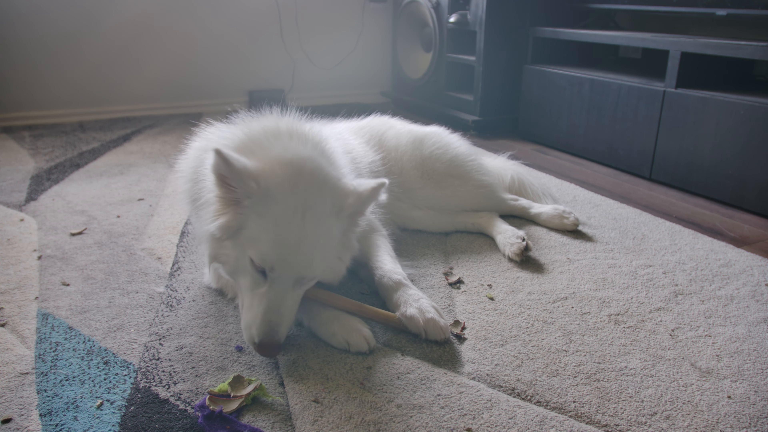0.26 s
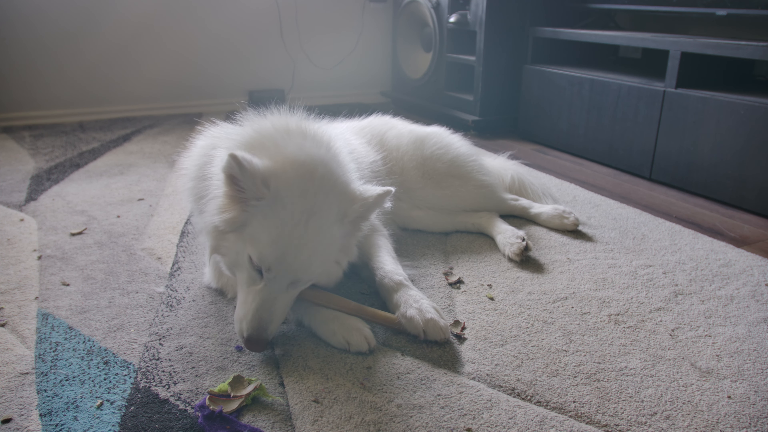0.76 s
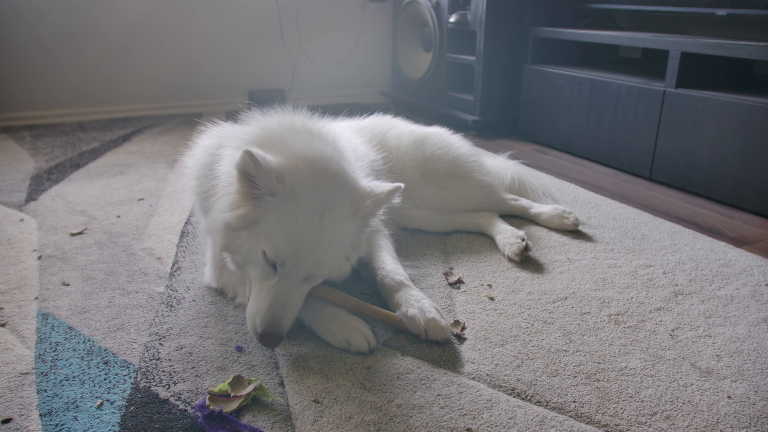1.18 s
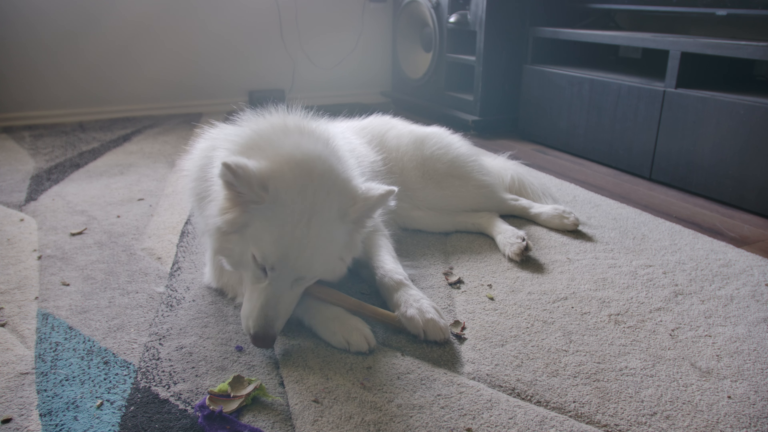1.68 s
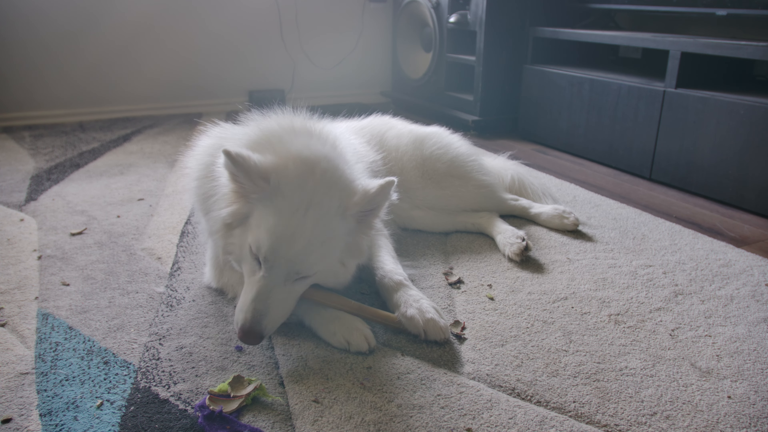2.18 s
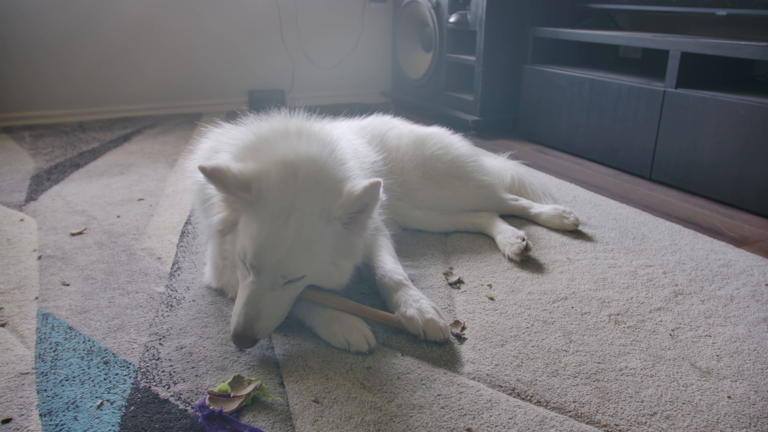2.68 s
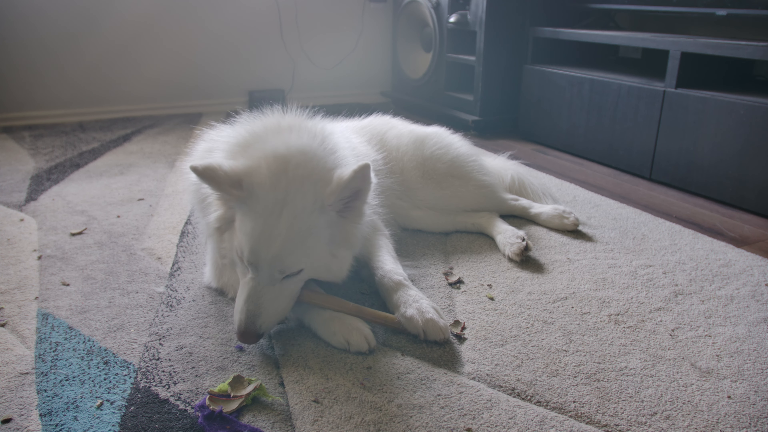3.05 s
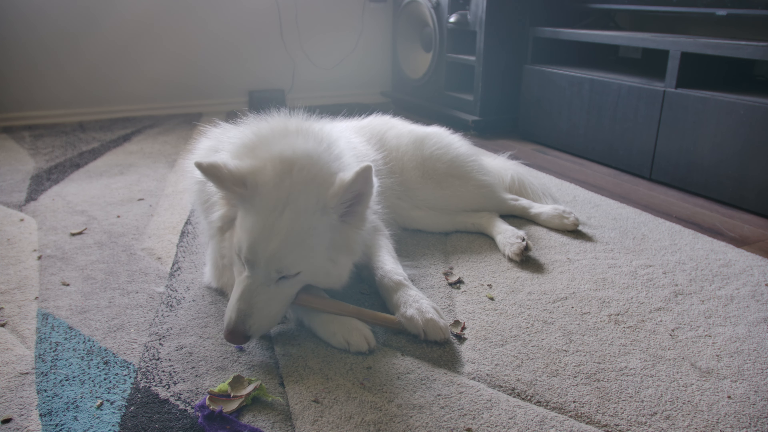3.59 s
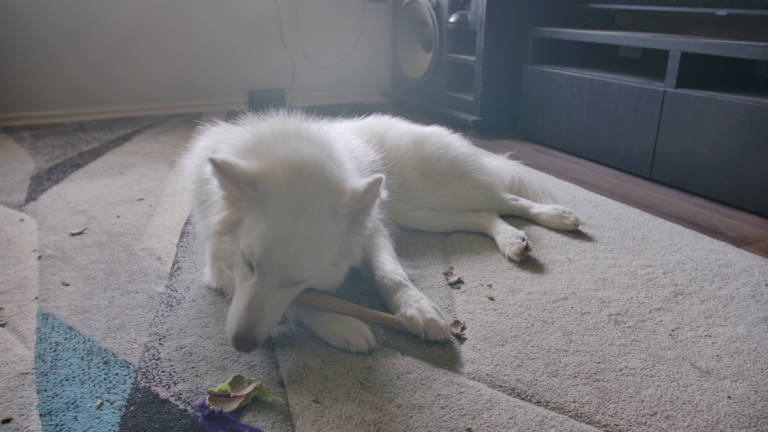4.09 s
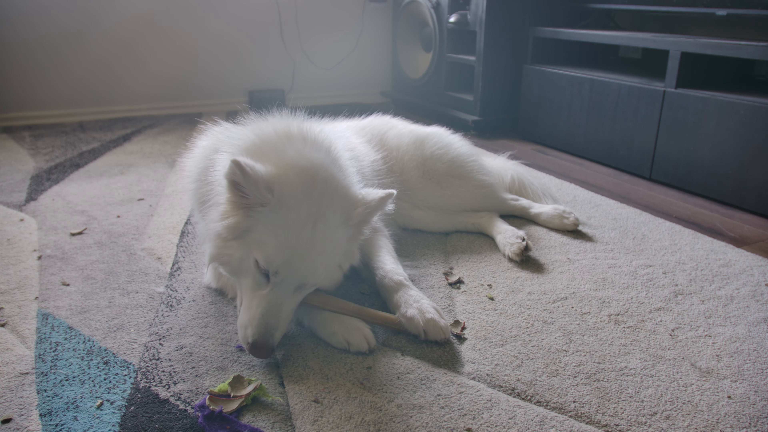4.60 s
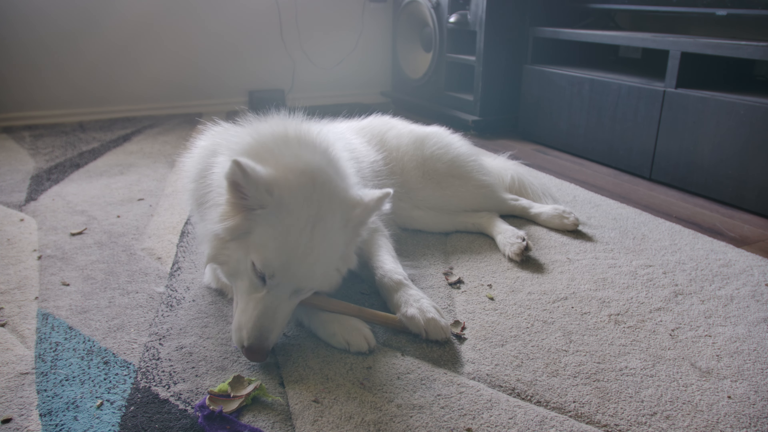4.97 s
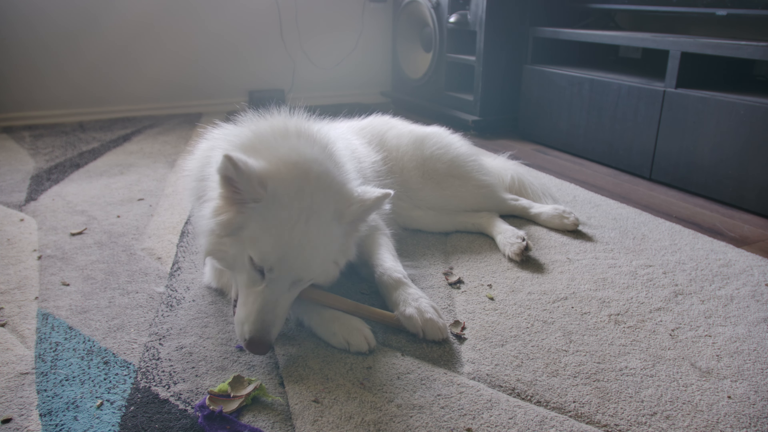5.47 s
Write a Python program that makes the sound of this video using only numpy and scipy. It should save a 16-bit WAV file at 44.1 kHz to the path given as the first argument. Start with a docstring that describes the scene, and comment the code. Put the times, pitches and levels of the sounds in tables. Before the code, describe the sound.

Close in a quiet carpeted living room, a dog chews a bone. Dull woody tooth knocks come irregularly, with soft rubbing and tiny wet mouth ticks between. Sharper splitting cracks fall near two, three and four seconds, and the heaviest crunch comes at about five. A faint room noise and thin electronic whine are held low and swell briefly around the bites.

```python
"""A quiet living room: a dog lying on the carpet gnaws a chew bone.
Teeth knock dully as damped bone modes; splits add a ringing splinter and crumbs.
Filtered noise makes the friction of the bone, and short filtered bursts the wet ticks of the mouth.
The camera's noise suppressor holds down steady room noise and a faint electronic whine made of sines;
each band opens when the sound rises well over its usual level."""
import sys
import numpy as np
from scipy import signal
from scipy.fft import rfft, irfft
from scipy.io import wavfile
from scipy.ndimage import uniform_filter1d, minimum_filter1d

SR = 44100
rng = np.random.default_rng(int(sys.argv[2]) if len(sys.argv) > 2 else 0)


def inscribe(sig):
    """Save sig as 16-bit PCM at rate SR to the path in sys.argv[1].

    A 1-D sig is mono; a 2-D sig holds one channel per row.
    Samples are clipped to [-1, 1] before scaling.
    """
    pcm = np.round(np.clip(np.atleast_2d(sig).T, -1, 1) * 32767)
    wavfile.write(sys.argv[1], SR, pcm.astype(np.int16))


N = 253116  # length of the scene in samples


def gain_of(db):
    """Decibels to amplitude."""
    return 10 ** (np.asarray(db) / 20)


def evened(x):
    """Scales to rms 1."""
    return x / np.sqrt(np.mean(x ** 2) + 1e-20)


def read(points, hz):
    """Reads a table on a log-frequency axis."""
    f, value = np.transpose(points)
    return np.interp(np.log(hz + 1), np.log(f + 1), value)


def band(x, low_hz, high_hz, low_order, high_order):
    """Causal high-pass at low_hz, then low-pass at high_hz."""
    high_pass = signal.butter(low_order, low_hz, "high", fs=SR, output="sos")
    low_pass = signal.butter(high_order, min(high_hz, SR / 2 - 1), fs=SR, output="sos")
    return signal.sosfilt(low_pass, signal.sosfilt(high_pass, x))


def add(mix, s, peak_db, sound):
    """Adds a short sound with its centre of energy at time s and its envelope peak at peak_db."""
    centre = np.average(np.arange(len(sound)), weights=sound ** 2)
    start = max(round(s * SR - centre), 0)
    part = mix[start:][:len(sound)]
    scaled = gain_of(peak_db) * sound / abs(signal.hilbert(sound)).max()
    part += scaled[:len(part)]


# colour of the room noise: (f/Hz, relative level per Hz/dB)
AIR_COLOUR = [(20, -1.5), (32, -9.5), (48, 3), (68, -1), (105, 0), (190, -3.5), (240, 0), (340, -9.5),
              (600, -10.5), (1000, -13.5), (1700, -20.5), (3200, -25.5), (5000, -26), (8000, -28),
              (15500, -31)]
# how alike the noise is left and right: (f/Hz, correlation/0-1)
AIR_LIKENESS = [(30, 0.15), (120, 0.99), (1000, 0.9), (2500, 0.79), (5000, 0.67), (12000, 0.68)]
AIR_DB = -53.5  # rms ahead of the noise suppressor


def air():
    """Steady room noise: a shared part plus an opposed part make two partly alike channels."""
    hz = np.fft.rfftfreq(N, 1 / SR)
    common, apart = rfft(rng.standard_normal((2, N)))
    same = np.clip(read(AIR_LIKENESS, hz), 0, 1)
    mid = np.sqrt(1 + same) * common
    side = np.sqrt(1 - same) * apart
    left_right = np.array([mid + side, mid - side])
    coloured = irfft(left_right * gain_of(read(AIR_COLOUR, hz)), N)
    return gain_of(AIR_DB) * evened(coloured)


EDGE_HZ = 15720  # upper limit of the sound, and of the whine's harmonics
WHINE_HZ, STRAY_HZ = 1000, 5146  # fundamental, and a tone outside its series
# rms ahead of the noise suppressor; every third harmonic is changed by THIRDS_DB
WHINE_DB, WHINE_DB_PER_OCTAVE, THIRDS_DB, STRAY_DB = -56, -7.5, -8, -75


def whine():
    """Thin steady tones from the camera's electronics: one harmonic series and a stray tone."""
    t = np.arange(N) / SR
    k = np.arange(1, EDGE_HZ // WHINE_HZ + 1)
    levels = WHINE_DB + WHINE_DB_PER_OCTAVE * np.log2(k) + THIRDS_DB * (np.gcd(k, 3) > 1)
    tones = [*zip(k * WHINE_HZ, levels), (STRAY_HZ, STRAY_DB)]
    return sum(np.sqrt(2) * gain_of(db) * np.sin(2 * np.pi * (hz * t + rng.random())) for hz, db in tones)


# how fast the room dies away: (f/Hz, time to fall 60 dB t60/s)
ROOM_DECAY = [(150, 0.222), (500, 0.21), (1500, 0.328), (8000, 0.7)]


def room(x, wet_db=-21):
    """A carpeted room: sparse weak reflections, each band dying at its own speed."""
    length = SR // 2
    reflections = rng.standard_normal(length) * (rng.random(length) < 3000 / SR)  # about 3000 a second
    hz, t, z = signal.stft(reflections, SR, nperseg=256)
    decay = gain_of(-60 * t / read(ROOM_DECAY, hz)[:, None])
    tail = signal.istft(z * decay, SR, nperseg=256)[1]
    return x + gain_of(wet_db) * signal.fftconvolve(x, tail / np.linalg.norm(tail))[:N]


# strokes of the bone on paw and carpet: (middle t/s, rms level/dB, centre f/Hz)
RUB_STROKES = [(.01, -56, 276), (.2, -55.5, 252), (.73, -60.5, 259), (.94, -59.5, 430), (1.2, -61.5, 234),
               (1.902, -59, 168), (3.04, -57, 100.7), (3.42, -66, 310), (4.069, -59.5, 239),
               (4.37, -64.5, 722), (5.119, -56.5, 680), (5.3, -56, 319)]
RUB_S, RUB_OCTAVES = 0.13, 1  # length and bandwidth of every stroke


def rubs():
    """Soft dull friction as the bone shifts on paw and carpet: noise in one band, faded in and out."""
    out = np.zeros(N)
    spread = 2 ** (RUB_OCTAVES / 2)
    for s, db, hz in RUB_STROKES:
        start, end = max(round((s - RUB_S / 2) * SR), 0), round((s + RUB_S / 2) * SR)
        part = out[start:end]
        noise = rng.standard_normal(SR // 2)
        friction = band(noise, hz / spread, hz * spread, low_order=3, high_order=5)[:len(part)]
        part += gain_of(db) * evened(friction * signal.windows.tukey(len(friction), .5))
    return out


# the mouth is wettest while the dog takes a new hold on the bone: (t/s, lift of the faint ticks' level/dB)
MOUTH_WETNESS = [(0, 4), (.1, 8), (.6, 3.5), (1.4, 5), (2.2, 0.5), (5.7, 5)]


def saliva(per_s=55, crackle_s=.0008, db=-57):
    """Faint ticks of lips and tongue: one tiny noise burst repeated at random times and sizes."""
    t = np.arange(SR // 50) / SR
    burst = rng.standard_normal(len(t)) * np.exp(-t / crackle_s)
    tick = band(burst, 1200, 5400, low_order=2, high_order=2)
    sizes = (rng.random(N) < per_s / SR) * gain_of(rng.uniform(-6, 6, N))
    wetness_db = np.interp(np.arange(N) / SR, *np.transpose(MOUTH_WETNESS))
    return gain_of(db + wetness_db) * signal.oaconvolve(sizes, tick / abs(tick).max())[:N]


def snap(hz, octaves, order, crackle_s=0.00107, crackle_db=-20):
    """One sharp snap and a millisecond of finer crackle ring a splinter or a small cavity."""
    t = np.arange(SR // 50) / SR
    crackle = rng.standard_normal(len(t)) * np.exp(-t / crackle_s)
    burst = (t == 0) + gain_of(crackle_db) * crackle
    edges = np.minimum(hz * 2 ** (octaves * np.array([-.5, .5])), SR / 2 - 1)
    return signal.sosfilt(signal.butter(order, edges, "bandpass", fs=SR, output="sos"), burst)


# sharper wet ticks of the mouth: (t/s, peak level/dB, centre f/Hz, width/octaves)
MOUTH_TICKS = [(.051, -36.5, 4130, 1.7), (.139, -44, 4500, 2.2), (.185, -37.5, 3360, 2),
               (.363, -53.5, 2020, 1.1), (.463, -44.5, 1770, .8), (.93, -45, 4100, 0.21),
               (1.027, -40, 4340, 0.088), (1.3333, -34, 5000, 0.78), (1.408, -39.5, 6500, 0.42),
               (1.424, -42, 7300, 0.55), (2.025, -40, 7100, 0.18), (3.104, -64.5, 7600, 0.7),
               (4.985, -33, 4770, 1.2), (5.122, -40.5, 6640, 0.45), (5.140, -38.5, 6760, .9)]


def ticks():
    """The sharper wet ticks of the mouth: snaps, each ringing in its own band."""
    out = np.zeros(N)
    for s, db, hz, octaves in MOUTH_TICKS:
        add(out, s, db, snap(hz, octaves, order=1))
    return out


# modes of bone and jaw, before the grip scales f and width:
# (f/Hz, width/Hz, level clamped between the teeth/dB, level ringing freely/dB)
BONE_MODES = [(141, 120, -5.5, -37.5), (283, 65.8, 2, -34.5), (490, 141, -2, 6.5), (647, 70, -18.5, -24),
              (893, 410, 1, -17), (1103, 94.4, 0.5, -3), (1605, 420, -4.5, 15.5)]


def knock(low_hz, high_hz, grip, freedom, edge_db=-10, hard_hz=1000):
    """A blow rings the bone, which the jaw damps quickly; soft contacts reach only the low modes."""
    t = np.arange(SR // 16) / SR
    hz, width, clamped_db, free_db = np.transpose(BONE_MODES)[:, :, None]
    mode_db = clamped_db + np.clip(freedom, 0, 1) * (free_db - clamped_db)
    height = width * gain_of(mode_db)
    damping = np.exp(-np.pi * width * grip * t)
    ring = (height * damping * np.cos(2 * np.pi * hz * grip * t)).sum(0)
    body = band(ring, low_hz, high_hz, low_order=2, high_order=8)
    edge = band(ring, 1100, 2300, low_order=4, high_order=8)  # the hard tip of the tooth
    hardness = min(high_hz / hard_hz, 1) ** 2
    return evened(body) + gain_of(edge_db) * freedom * hardness * evened(edge)


# splits within a few milliseconds of a jaw thud:
# (t/s, knock peak level/dB, treble cut-off f/Hz, grip/factor on the modes, splinter peak level/dB)
BONE_CRACKS = [(1.9575, -35, 1220, 1.06, -46.5), (3.020, -43.5, 1880, 0.67, -32),
               (3.931, -25.5, 1430, 1.14, -33.5), (4.985, -18, 1800, 0.68, -49.5)]
# bands a splinter rings in: (centre f/Hz, width/octaves, relative level/dB)
SPLINTER_BANDS = [(2725, .25, 1), (4930, 1.6, -2.5)]


def cracks(low_hz=550, freedom=.22, crumbs_per_s=300, crumbs_db=-31, crumbs_s=.09):
    """The bone splits with a hard knock and a ringing splinter; crumbs, tiny copies of the knock, die away."""
    t = np.arange(SR // 4) / SR
    out = np.zeros(N)
    for s, knock_db, high_hz, grip, splinter_db in BONE_CRACKS:
        blow = knock(low_hz, high_hz, grip, freedom)
        add(out, s, knock_db, blow)
        splinter = sum(gain_of(db) * evened(snap(hz, octaves, order=2)) for hz, octaves, db in SPLINTER_BANDS)
        add(out, s, splinter_db, splinter)
        hits = rng.random(len(t)) < crumbs_per_s / SR
        crumbs = hits * rng.uniform(-1.03, 1, len(t)) * np.exp(-t / crumbs_s)
        part = out[round(s * SR):][:len(t)]
        crumbling = signal.oaconvolve(crumbs, blow / abs(blow).max())
        part += gain_of(knock_db + crumbs_db) * crumbling[:len(part)]
    return out


# one row a tooth contact: (t/s, peak level/dB, bass roll-off f/Hz, treble cut-off f/Hz,
# grip/factor on the modes, freedom of the bone/0-1)
TOOTH_CONTACTS = [(0.142, -33.5, 404, 324, 1.37, 0.5), (0.4629, -28, 550, 965, 1.02, 0.09),
                  (0.711, -36, 360, 278, 1.1, 0.16), (0.812, -24.5, 100, 473, 1.07, 0.32),
                  (0.8819, -38, 400, 460, 1.47, 0.03), (1.335, -39, 1100, 1280, 1.08, 0.5),
                  (1.756, -30.5, 300, 1070, 1.047, 0.23), (1.9525, -26, 208, 793, 0.98, 0.07),
                  (2.291, -30.5, 130, 1160, 1.05, 0.37), (3.0212, -27, 306, 815, 0.93, 0.05),
                  (3.3907, -40, 223, 370, 0.8, 0.9), (3.7434, -28, 253, 1280, 1.11, 0.29),
                  (3.935, -16.5, 94, 540, 1.43, 0.1), (4.3059, -32.5, 453, 1020, 1.1, 0.3),
                  (4.3226, -30, 473, 1056, 0.98, 0.33), (4.9873, -10, 550, 385, 1.08, 0.12),
                  (5.0112, -24, 139, 1510, 0.88, 0.1), (5.0446, -30, 93.5, 1290, 0.95, 0),
                  (5.255, -42.5, 228, 490, 1.1, 0.4)]


def bites():
    """The teeth knock on the bone as the jaw closes, each contact with its own grip and hardness."""
    out = np.zeros(N)
    for s, db, low_hz, high_hz, grip, freedom in TOOTH_CONTACTS:
        add(out, s, db, knock(low_hz, high_hz, grip, freedom))
    return out


# rise over the usual level that half opens the noise suppressor: (f/Hz, rise in level/dB)
OPENING_RISE = [(80, 8), (300, 8), (1000, 13), (2700, 7.5), (4300, 16.5), (6000, 15), (15000, 19.5)]


def suppress(x, knee_db=3.0, release_db_per_s=110, depth_db=16.5):
    """Noise suppressor: a band opens just before it rises over its median power, and closes slowly."""
    hz, t, z = signal.stft(x, SR, nperseg=1024, noverlap=896)
    mono_power = abs(z.mean(0)) ** 2
    power = abs(uniform_filter1d(mono_power, size=7, axis=1)) + 1e-20
    rise = power / np.median(power, axis=1, keepdims=True)
    over_db = 10 * np.log10(uniform_filter1d(rise, size=7, axis=0))
    fall = release_db_per_s * t
    held_db = np.maximum.accumulate(over_db + fall, axis=1) - fall
    ahead_db = -minimum_filter1d(-held_db, size=15, axis=1)  # the look-ahead
    opening = .5 + .5 * np.tanh((ahead_db - read(OPENING_RISE, hz)[:, None]) / (2 * knee_db))
    gain = gain_of(depth_db * (opening - 1))
    return signal.istft(z * gain, SR, nperseg=1024, noverlap=896)[1][:, :N]


def scene():
    """The dog straight ahead, in the room's steady noise."""
    dog = bites() + cracks() + rubs() + ticks() + saliva()
    return room(dog) + air()


def record(dry):
    """The whine joins ahead of the suppressor, so it swells with the room noise; then the band limit."""
    sound = suppress(dry + whine())
    low_pass = signal.firwin(1023, EDGE_HZ, window=("kaiser", 9), fs=SR)
    return signal.oaconvolve(sound, low_pass[None], "same")


dry = scene()
out = record(dry)
inscribe(out)
```